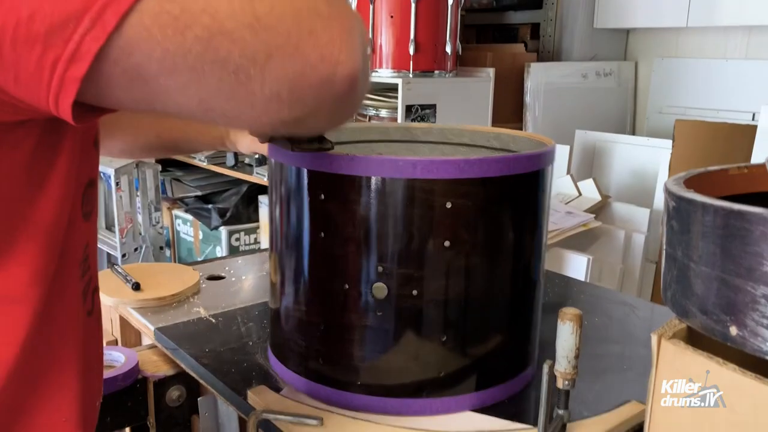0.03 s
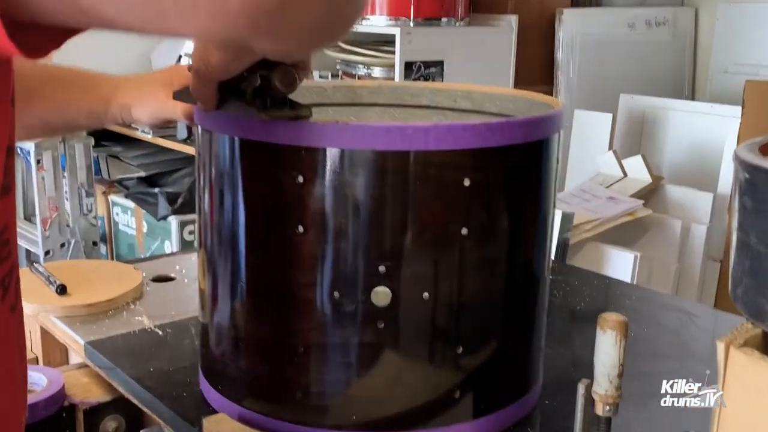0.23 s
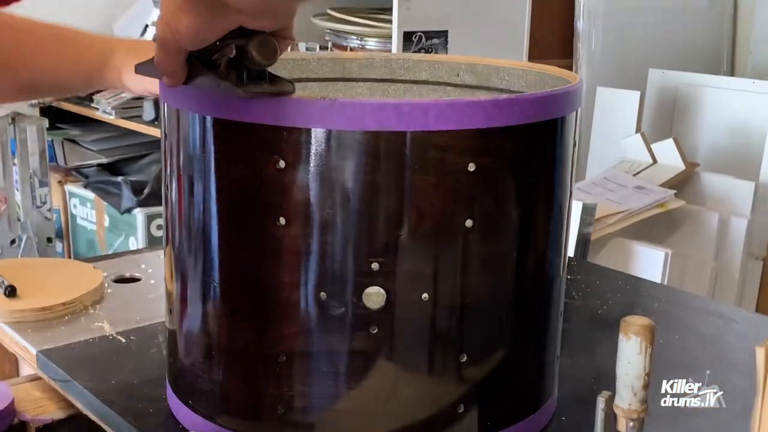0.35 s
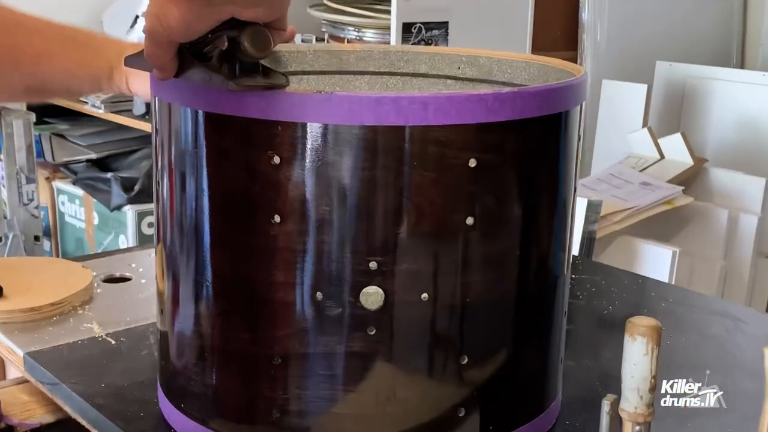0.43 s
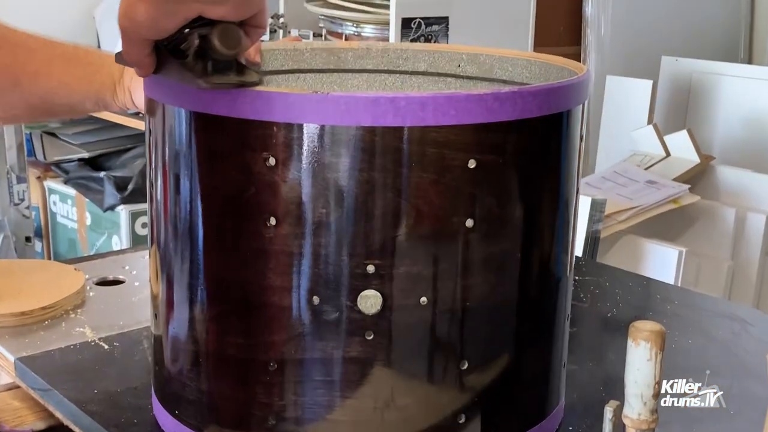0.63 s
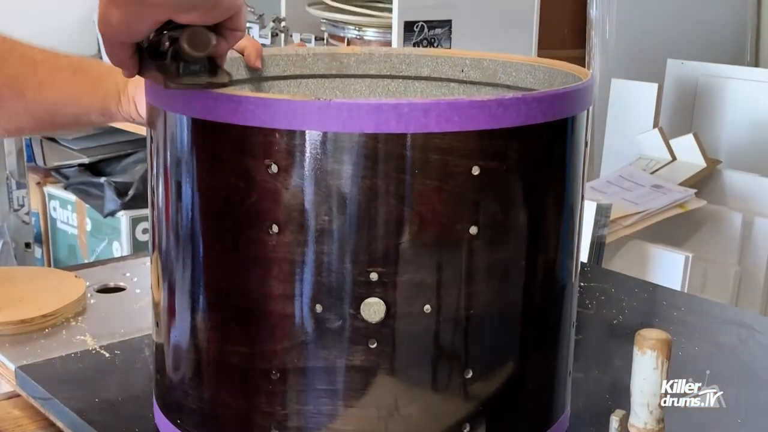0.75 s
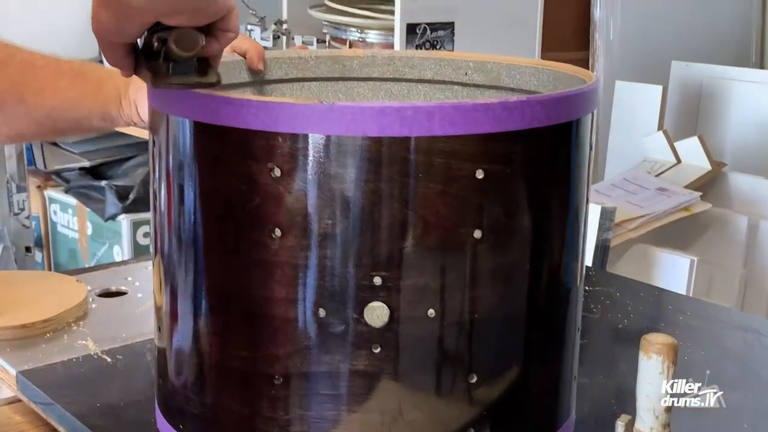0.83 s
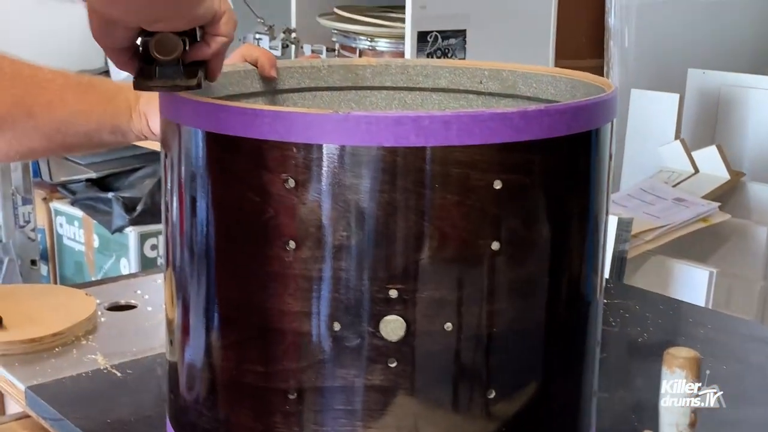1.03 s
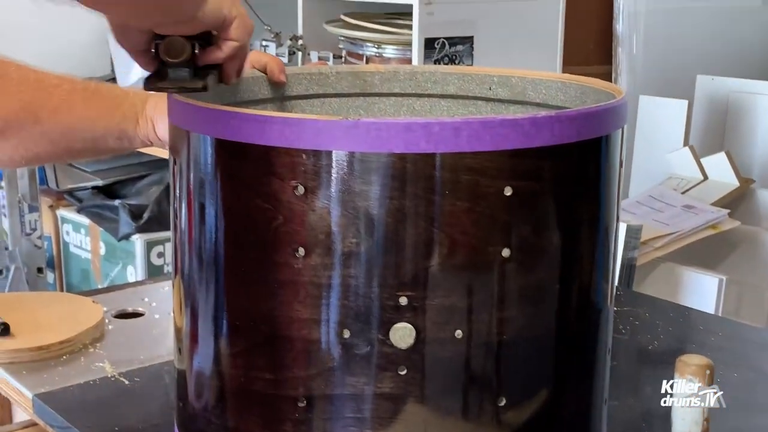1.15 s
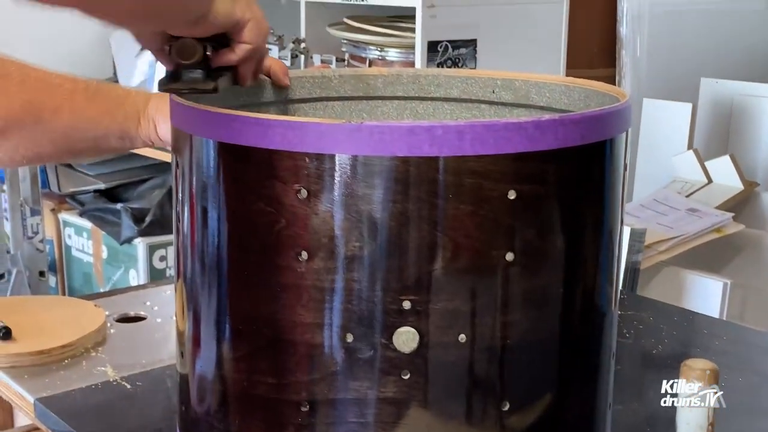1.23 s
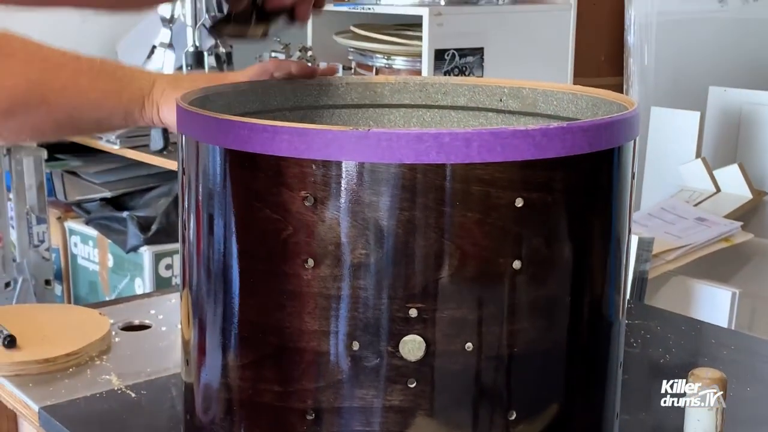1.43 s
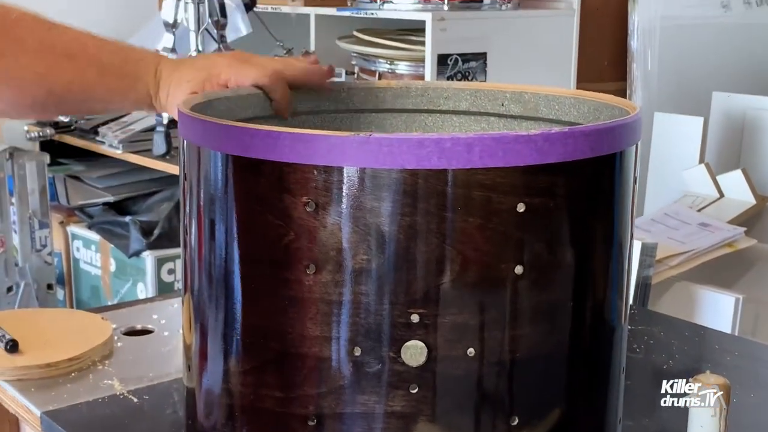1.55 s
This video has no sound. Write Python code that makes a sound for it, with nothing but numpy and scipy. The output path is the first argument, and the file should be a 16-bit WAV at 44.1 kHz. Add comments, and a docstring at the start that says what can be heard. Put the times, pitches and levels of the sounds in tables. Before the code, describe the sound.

A hand plane shaves the rim of a wooden drum shell. It first slides back, knocks hollowly and settles with a soft bump, then makes one long, hissing, rasping cut, heard close in a small, quiet workshop.

```python
"""A block plane trims the rim of a wooden drum shell in a small, quiet workshop.
It slides back, knocks on the rim, is seated with a soft bump and is pushed through one long cut.
Snapping fibres, a dense train of impulses, hiss and force the modes of shell and plane into vibration.
The blade chatters early on, and the shell drones lower as the plane travels round."""
import sys
import numpy as np
from scipy import signal
from scipy.fft import rfft, irfft
from scipy.io import wavfile
from scipy.ndimage import uniform_filter1d

SR = 44100
rng = np.random.default_rng(int(sys.argv[2]) if len(sys.argv) > 2 else 0)


def transcribe(u):
    """Save the signal u as a 16-bit wav file named by the first command-line argument.

    u: samples, shape (n,) or (channels, n), limited to [-1, 1]; the rate is SR.
    q: integer samples, one column per channel.
    """
    v = np.clip(np.atleast_2d(u).T, -1, 1)
    q = np.round(v * 32767).astype(np.int16)
    wavfile.write(sys.argv[1], SR, q)


N = 70560
TIME = np.arange(N) / SR
FREQS = np.maximum(np.arange(N // 2 + 1) * SR / N, 1)


def from_db(db):
    """Amplitude ratio: tenfold for every 20 dB."""
    return 10 ** (np.asarray(db) / 20)


def rms_one(x):
    """Normalisation to unit mean power."""
    return x / np.sqrt(np.mean(x ** 2) + 1e-20)


def at_hz(points):
    """Interpolation of a curve over log frequency."""
    hz, value = np.transpose(points)
    return np.interp(np.log(FREQS), np.log(hz), value)


def colour(x, spectrum):
    """Zero-phase filtering by a spectral envelope, at unit power."""
    return rms_one(irfft(rfft(x) * from_db(at_hz(spectrum)), N))


def butterworth(x, hz, kind="low", order=2):
    """Filtering with a maximally flat passband."""
    return signal.sosfilt(signal.butter(order, hz, kind, fs=SR, output="sos"), x + 1e-18)


def widen(pair):
    """Partial coherence: two independent signals mix into a stereo pair, most alike in the bass."""
    # Each row: frequency in Hz, left-right coherence.
    coherence = [(100, .97), (350, .94), (700, .8), (1500, .5), (4000, .45), (8000, .85), (14000, .85)]
    alike = at_hz(coherence)
    mid, side = rfft(pair) * np.sqrt([(1 + alike) / 2, (1 - alike) / 2])
    return irfft([mid + side, mid - side], N)


def noise():
    """White Gaussian noise, partly coherent between left and right."""
    return widen(rng.standard_normal((2, N)))


def snaps(clump_db=1.5, per_second=9000, spread_db=2.5):
    """Shot noise: wood fibres break as random impulses of uneven size, in clumps."""
    clumps = from_db(clump_db * rms_one(butterworth(rng.standard_normal(N), hz=150)))
    breaks = rng.random((2, N)) < per_second / SR
    sizes = from_db(spread_db * np.minimum(rng.exponential(1, (2, N)), 5))
    return widen(breaks * sizes * rng.choice([-1, 1], (2, N)) * clumps)


def slides(attack_s=.0098, release_s=.026):
    """Sliding friction: the sole rubs lightly on the rim, taking no shaving."""
    # Each row: start and end in seconds, level in dB, swell in dB per second, low-pass cutoff in Hz.
    strokes = [(.055, 0.264, -44.5, 39, 18700), (0.476, 0.498, -56.5, 5, 6000),
               (1.295, 1.38, -53, -26, 6160), (1.44, 1.483, -57.5, 5, 5300)]
    # Each row: frequency in Hz, relative spectral level in dB.
    friction_spectrum = [(70, -2), (240, 1), (430, -5), (540, -11), (700, -2.5), (1050, -9.5), (1550, -5.5),
                         (2000, -14), (4500, -16), (7500, -23.5), (10500, -20.5), (15500, -27)]
    friction = colour(snaps(clump_db=.5), friction_spectrum)
    out = 0
    for start, end, db, swell, cutoff_hz in strokes:
        edges = np.exp(-np.maximum(start - TIME, 0) / attack_s - np.maximum(TIME - end, 0) / release_s)
        level = from_db(db + swell * (np.clip(TIME, start, end) - start))
        out += edges * level * butterworth(friction, cutoff_hz)
    return out


def knocks(crack_t60_s=.077):
    """Impact excitation: the shell's modes decay freely, and a softer contact rings duller."""
    # Each row: time in seconds, strength in dB, contact cutoff in Hz, relative crack level in dB,
    # pitch factor for that spot and grip.
    impacts = [(.217, -21, 2400, 0, 1), (.2235, -25, 900, -6, 1), (.2385, -24, 600, -9, 1),
               (.2668, -38, 2400, 6, 1.06), (.2725, -23, 800, -14, 1.06), (.502, -32, 750, -16, .77),
               (1.151, -33, 350, -20, .9), (1.297, -30, 170, -18, .72)]
    # Each row: frequency in Hz before the pitch factor, relative level in dB, T60 in seconds.
    shell_modes = [(83.8, -14, 0.32), (124.7, -10.5, 0.13), (175, -9, 0.16), (216.7, 4, 0.12),
                   (279.8, 5, 0.086), (363, -4.5, 0.074), (416, -2.5, .17), (451, -2, 0.046),
                   (612, -0.5, 0.058), (669, -7, 0.052), (730, 1, 0.023), (891.4, 1, 0.091),
                   (931.4, -4.5, .12), (1330, -22, 0.034), (1480, -15, 0.049), (2074, -14, 0.14),
                   (2330, -23, .07)]
    crack_noise = rms_one(butterworth(noise(), [556, 2060], "band", order=3))
    out = np.zeros((2, N))
    for time_s, db, cutoff_hz, crack_db, pitch in impacts:
        start = int(time_s * SR)
        age = TIME[:min(N - start, SR // 2)]
        span = slice(start, start + len(age))
        ring = sum((-1) ** k * from_db(mode_db - 60 * age / t60) * np.sin(2 * np.pi * hz * pitch * age)
                   for k, (hz, mode_db, t60) in enumerate(shell_modes))
        crack = from_db(crack_db - 60 * age / crack_t60_s) * crack_noise[:, span]
        out[:, span] += from_db(db) * (butterworth(ring, cutoff_hz) + crack)
    return out


def edge_tick(start_s=.239, db=-30, t60_s=.008):
    """A brief contact has a broad spectrum: the steel edge ticks against the wood."""
    return from_db(db - 60 * np.abs(TIME - start_s) / t60_s) * (TIME > start_s) * noise()


def band_limit(x, modes):
    """Band-pass filtering steepens the skirts of a group of modes, at unit power."""
    return rms_one(butterworth(x, [modes[0][0] * .8, modes[-1][0] * 1.2], "band"))


def resonate(x, modes):
    """Modal superposition: damped resonators in parallel, alternating in sign."""
    out = 0
    for k, (hz, width_hz, db) in enumerate(modes):
        radius = np.exp(-np.pi * width_hz / SR)
        feedback = [1, -2 * radius * np.cos(2 * np.pi * hz / SR), radius ** 2]
        out += (-1) ** k * from_db(db) * (1 - radius ** 2) * signal.lfilter([1, 0, -1], feedback, x)
    return band_limit(out, modes)


def driven_shell(modes, centre_s, window_samples=1300, sag_per_s=.04):
    """Forced vibration: snaps drive shell modes, whose pitch sags as the plane travels."""
    slowing_time = np.cumsum(1 - sag_per_s * (TIME - centre_s)) / SR
    ring = np.array([np.interp(slowing_time, TIME, side, period=N / SR)
                     for side in resonate(snaps(), modes)])
    # Dividing by the running rms evens out chance swings of level.
    power = uniform_filter1d(np.mean(ring ** 2, axis=0), window_samples)
    return band_limit(ring / np.sqrt(power + 1e-9), modes)


def fibre_hiss(reflections_t60_s=.03):
    """Interference: a short, dense cluster of early reflections finely colours the hiss of snaps."""
    # Each row: frequency in Hz, relative spectral level in dB.
    hiss_spectrum = [(1200, -28), (2400, -7), (3100, 1), (3800, 3), (5700, -1.5), (7200, -1.5), (8600, -10),
                     (10200, 3), (11800, -10), (13000, -5.5), (15500, -24)]
    # Snaps also ring the plane's modes. Each row: frequency in Hz, bandwidth in Hz, relative level in dB.
    plane_modes = [(4485, 22, -1), (4698, 180, -5), (6475, 66, -10), (7120, 146, -9)]
    ring = from_db([[.75], [.25]]) * resonate(snaps(), plane_modes)  # left, right
    age = TIME[:SR // 10]
    early_reflections = rng.standard_normal(len(age)) * from_db(-60 * age / reflections_t60_s)
    hiss = signal.fftconvolve(snaps(clump_db=0), early_reflections[None], axes=1)[:, :N]
    return ring + from_db(2) * colour(hiss, hiss_spectrum)


def cut(fade_db_per_s=406):
    """Broadband excitation: fibres snapping under the blade hiss, rasp and keep the shell droning."""
    # Each row: time in seconds, then relative levels in dB of the hiss and of the shell's upper,
    # middle, low and deepest modes.
    envelopes = [(0.554, -87, -61, -58, -57, -60), (0.573, -63.5, -46, -33.5, -48, -60),
                 (0.599, -52, -36.5, -32, -34, -41), (0.638, -44.5, -32.5, -29, -33, -43),
                 (0.721, -41, -33.5, -27, -32.5, -47), (0.789, -40.5, -29.5, -31.5, -41.5, -48),
                 (0.886, -38.5, -34.5, -28.5, -35, -46.5), (0.961, -43, -33.5, -47, -35.5, -48),
                 (1.01, -43.5, -33.5, -37, -33, -37.5), (1.08, -41.5, -33, -32, -30, -35),
                 (1.125, -41, -33, -44, -30, -38.7), (1.167, -37, -31, -31, -32, -28.5),
                 (1.227, -40.5, -30.5, -39.5, -40, -39), (1.298, -43.4, -35, -45.5, -37.5, -41),
                 (1.333, -66, -64, -60.0, -67, -58)]
    # The shell's modes in three groups. Each row: frequency in Hz, bandwidth in Hz, relative level in dB.
    upper_modes = [(1191, 76, -6.5), (1528, 57, 1.5), (1670, 55, -9), (1690, 126, -9), (1988, 45, 2),
                   (2042, 53, -1), (2693, 58, -8), (3143, 56, -10.5)]
    middle_modes = [(638.2, 36, -0.5), (670, 48.3, -0.5), (715.6, 18.3, -3), (850, 18, -23.5)]
    low_modes = [(298.9, 16, -0.5), (338, 14.5, 2.5), (372.9, 13, -0.5), (408.8, 17.5, -2.5), (431, 75, -7)]
    # The wood's broad rasp. Each row: frequency in Hz, relative spectral level in dB.
    rasp_spectrum = [(60, -16), (150, -4.5), (300, -4.5), (450, 6), (540, -3.5), (800, 2), (1030, 1),
                     (1250, -4), (1800, -1), (2400, -6), (4000, -27)]
    times, *levels = np.transpose(envelopes)
    centre_s = times.mean()
    fade_db = fade_db_per_s * np.abs(TIME - np.clip(TIME, times[0], times[-1]))  # outside the stroke
    hiss, upper, middle, low, deep = [from_db(np.interp(TIME, times, db) - fade_db) for db in levels]
    middle_ring = driven_shell(middle_modes, centre_s, window_samples=500)
    whine = from_db(-24.5) * driven_shell([(2680, 50, 0)], centre_s, window_samples=500)
    shell = np.hypot(from_db(-1) * middle, chatter()) * (middle_ring + whine)  # drives add in power
    shell += from_db(-1) * upper * driven_shell(upper_modes, centre_s)
    shell += from_db(-.5) * low * driven_shell(low_modes, centre_s)
    shell += from_db(1) * deep * driven_shell([(204, 31, 0)], centre_s)
    rasp = from_db(-3.5) * upper * colour(snaps(), rasp_spectrum)
    return shell + hiss * fibre_hiss() + rasp


def chatter(rise_s=.004, width_s=.0055):
    """Amplitude modulation: each catch of the juddering blade adds a Gaussian pulse of drive."""
    # Each row: time in seconds, relative peak level in dB.
    catches = [(0.618, -22.5), (0.641, -16.5), (0.661, -13.5), (0.689, -48), (0.721, -14.5), (0.746, -16),
               (0.775, -17.5), (0.803, -18)]
    return sum(from_db(db - 4.5) * np.exp(-((TIME - time_s - rise_s) / width_s) ** 2)
               for time_s, db in catches)


def reverberation(x, t60_s=.26, first_echo_s=.0039, db=-6):
    """Diffuse field: the dense, dull reflections of a small cluttered room decay exponentially."""
    tail = butterworth(noise(), hz=5270, order=1) * from_db(-60 * TIME / t60_s) * (TIME > first_echo_s)
    tail *= np.sqrt(2 * np.log(1000) / (t60_s * SR))  # normalises the energy of the decay
    return from_db(db) * signal.fftconvolve(x, tail, axes=1)[:, :N]


def room_tone(db=-55):
    """Stationary noise: the workshop's faint, low background."""
    # Each row: frequency in Hz, relative spectral level in dB.
    spectrum = [(25, -2), (55, 6.5), (100, 9.5), (140, -9), (210, 9), (400, -17.5), (950, -2),
                (1500, -20.5), (4000, -22), (9000, -40), (15000, -39)]
    return from_db(db) * colour(noise(), spectrum)


def scene():
    """Superposition of direct sound, reflections and room tone."""
    direct = slides() + knocks() + edge_tick() + cut()
    return direct + reverberation(direct) + room_tone()


def record(dry, treble_hz=7640, left_lag_s=.00021):
    """Level and phase differences between two microphone ports give a band-limited stereo image."""
    # Each row: frequency in Hz, left minus right level in dB.
    balance = [(100, -1.5), (250, -0.5), (650, 2.5), (1500, 2.5), (2600, 1), (5000, -3.5), (8000, -0.5)]
    # Each row: frequency in Hz, phase lead of the left port in radians.
    port_lead = [(100, 0), (700, 0.7), (1900, 0.5), (2600, 1.66), (5000, 2.5), (6400, -2)]
    lead = at_hz(port_lead) - 2 * np.pi * left_lag_s * np.maximum(FREQS - treble_hz, 0)
    sides = np.array([[.5], [-.5]])
    response = from_db(sides * at_hz(balance)) * np.exp(1j * sides * lead)
    heard = butterworth(irfft(rfft(dry) * response, N), hz=48, kind="high", order=3)
    treble_cut = signal.ellip(12, .1, 80, 15800, fs=SR, output="sos")
    return signal.sosfilt(treble_cut, heard)


dry = scene()
out = record(dry)
transcribe(out)
```